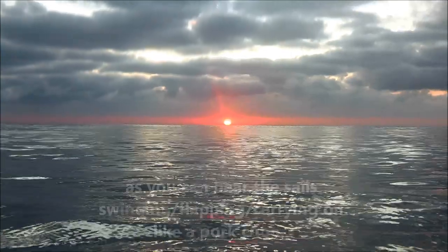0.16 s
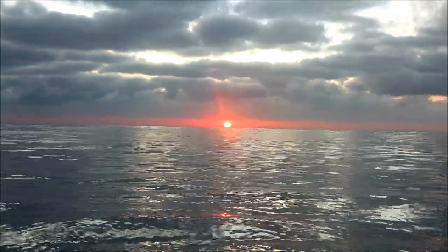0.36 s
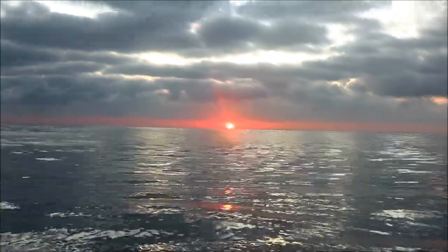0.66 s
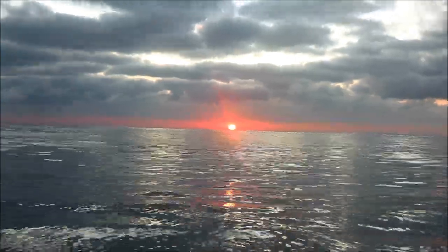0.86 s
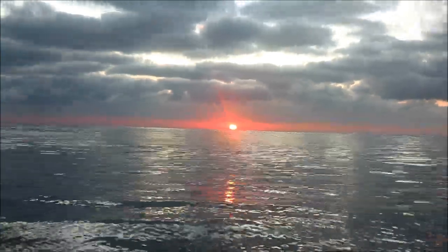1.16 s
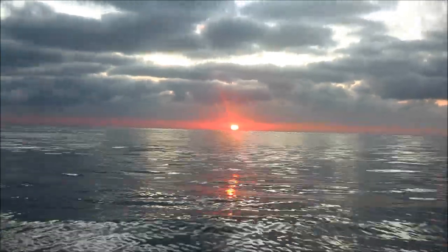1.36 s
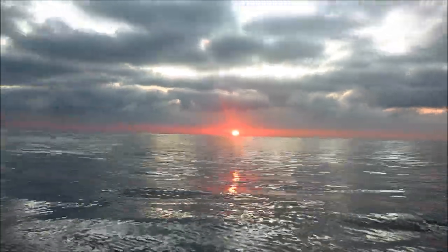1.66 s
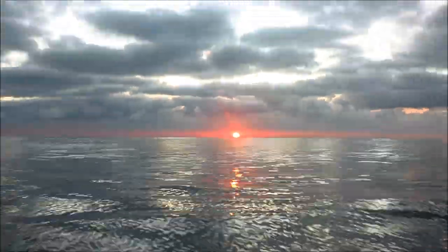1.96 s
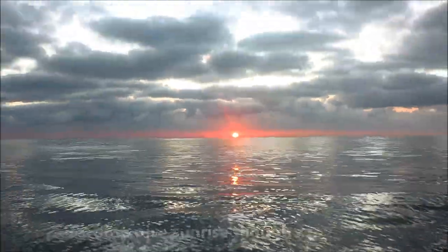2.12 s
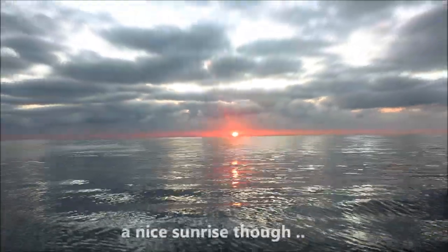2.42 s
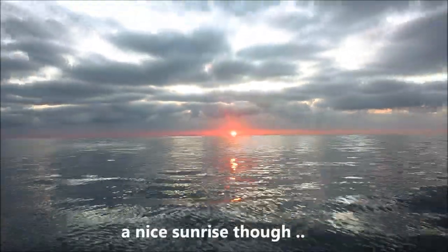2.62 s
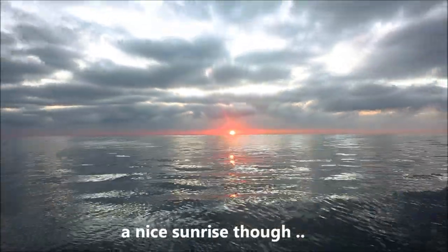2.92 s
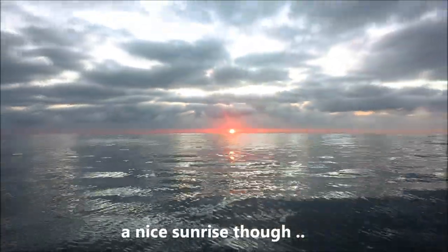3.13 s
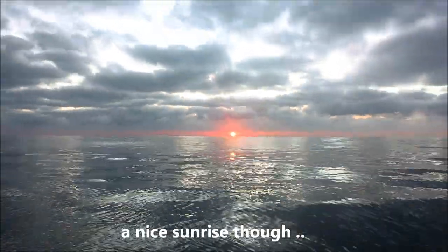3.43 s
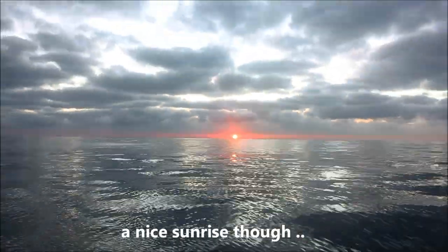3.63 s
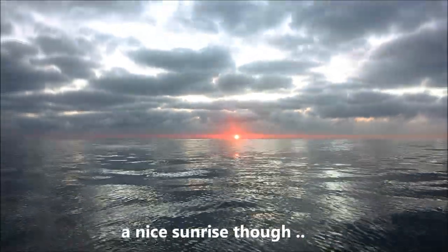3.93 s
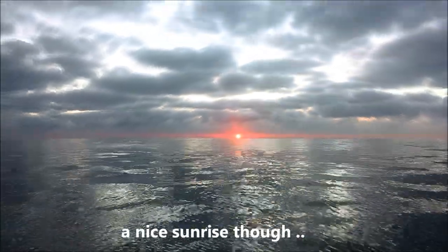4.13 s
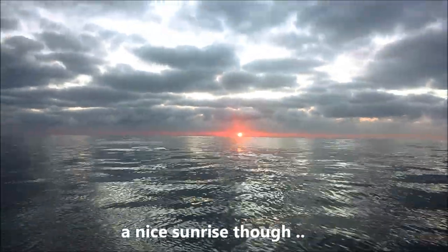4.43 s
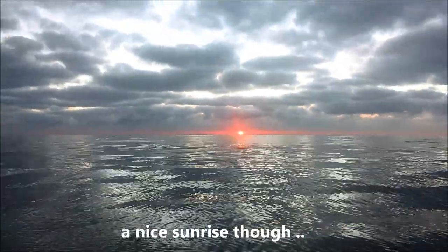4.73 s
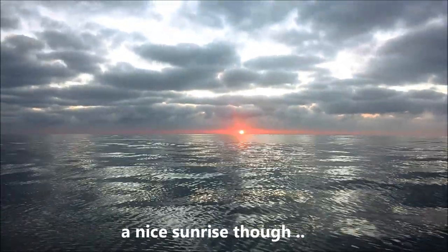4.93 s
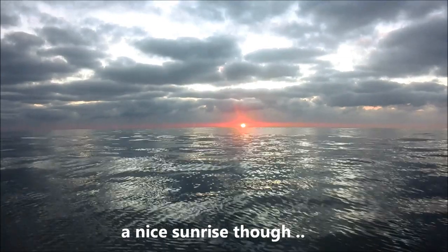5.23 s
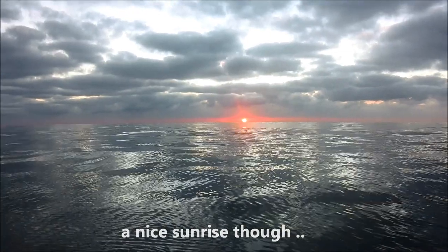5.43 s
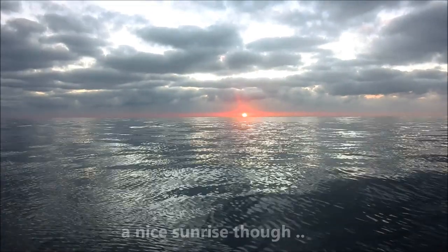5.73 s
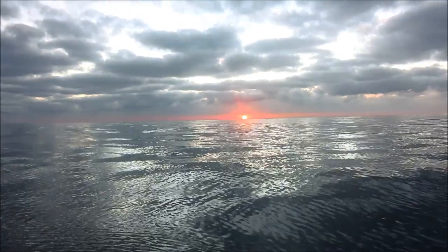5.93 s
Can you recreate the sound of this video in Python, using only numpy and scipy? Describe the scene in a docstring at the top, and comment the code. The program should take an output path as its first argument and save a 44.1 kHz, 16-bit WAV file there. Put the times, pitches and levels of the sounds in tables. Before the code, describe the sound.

On the deck of a becalmed sailing boat, a ratchet block purrs at once with rapid clicks and a low deck rumble, then stops. Loose fittings clack and jingle. Two more strong ratchet pulls follow, parted by a hard knock, then more clatter and a brief weak purr. Sails puff low air past close stereo microphones; water laps faintly.

```python
"""A ratchet block purrs at once: on a becalmed sailing boat, a sheet runs again and again, shaking the deck.
Each pull is a train of pawl clicks rung through housing and deck; knocks are short groups of decaying tones.
Slack lines and fittings snap taut and clack: noise bursts, chattering through the rig's resonances.
Flapping sails push short low waves of air, and eddies of noise, past two small microphones on deck.
Water washes faintly along the hull as filtered noise."""
import sys
import numpy as np
from scipy import signal
from scipy.fft import rfft, irfft, next_fast_len
from scipy.io import wavfile
from scipy.ndimage import map_coordinates

SR = 44100
rng = np.random.default_rng(int(sys.argv[2]) if len(sys.argv) > 2 else 0)


def materialize(psi):
    """Save the field psi as 16-bit PCM at rate SR to the path in sys.argv[1].

    A 1-D psi becomes a single channel; in a 2-D psi each row is a channel.
    """
    bounded = np.clip(np.atleast_2d(psi).T, -1, 1)
    quanta = np.round(bounded * 32767).astype(np.int16)
    wavfile.write(sys.argv[1], SR, quanta)


N = 267844
TIME = np.arange(N) / SR  # s

# single puffs of air off the sails: at_s, relative level_db, pitch_hz, left_over_right_db
PUFFS = [(0.137, -21, 143, -15), (0.187, -21.5, 120, -4), (.246, -22.5, 210, -9), (0.298, -32, 139, 8),
         (0.398, -20.5, 114.9, 7), (0.446, -19, 196, 2), (0.705, -21, 280, -10), (.732, -18, 165, -4),
         (.763, -20.5, 162.7, -4), (.781, -27, 332, -13), (0.798, -24.5, 262, 0), (0.853, -24.5, 192, 4.5),
         (0.891, -27, 294, 5), (1.0, -18.5, 134, 6), (1.077, -20.5, 191, 4.5), (1.426, -33.5, 101, 1),
         (2.803, -20.5, 257, -1), (2.884, -24, 157, -20), (2.98, -14, 112, -27), (3.071, -13.5, 172.6, -31),
         (3.133, -14, 153, -19), (3.217, -23.5, 172.6, -30), (3.277, -23, 96, -27), (3.355, -16, 104.6, 28),
         (3.48, -20, 134.9, -5), (3.616, -19, 144.9, -10), (3.849, -23.5, 110, -13), (4.175, -24.5, 152, 0),
         (4.223, -24.5, 212, -9), (4.272, -27, 251, 0), (4.346, -24, 134, -7), (5.815, -37, 100, 19)]
# resonances of the rig: pitch_hz, width_hz, level_db
RIG_MODES = [(456, 8.6, -30), (877, 25, -10.5), (1273, 20, -5.5), (1680, 12, 0.5), (2070, 15, -25),
             (2500, 50.04, -23), (3190, 86, -20), (4537, 150, -25)]


def amp(db):
    """Decibels to gain."""
    return 10 ** (np.asarray(db) / 20)


def unit(x):
    """Scaled to rms 1."""
    return x / np.sqrt(np.mean(x ** 2) + 1e-20)


def along(points, hz):
    """(Hz, value) points read on a log frequency axis."""
    f, v = np.transpose(points)
    return np.interp(np.log(hz + 1), np.log(f + 1), v)


def shape(points):
    """The gain function of a spectrum given as (Hz, dB) points."""
    return lambda hz: amp(along(points, hz))


def wobble(rate):
    """A smooth random curve, rate knots a second."""
    knots = rng.standard_normal(int(N * rate / SR) + 4)
    return map_coordinates(knots, [TIME * rate])


def filtered(x, response):
    """x times a complex response of frequency."""
    size = x.shape[-1]
    m = next_fast_len(size + size // 8)
    return irfft(rfft(x, m) * response(np.fft.rfftfreq(m, 1 / SR)), m)[..., :size]


def noise(colour, size=N):
    """Stereo noise of rms 1, more alike at the two microphones in the bass than in the treble."""
    # likeness of the two microphones: pitch_hz, left-right correlation (0 to 1)
    alike = [(60, 0.88), (150, 1), (600, 0.91), (1400, 0.85), (3100, 0.87), (6800, 0.65), (15000, 0.39)]

    def mid_and_side(hz):
        turn = np.arccos(np.clip(along(alike, hz), -1, 1)) / 2
        return colour(hz) * np.array([np.cos(turn), np.sin(turn)])

    mid, side = filtered(rng.standard_normal((2, size)), mid_and_side)
    return unit(np.array([mid + side, mid - side]))


def ring(x, modes, direct_db):
    """x through a body: a direct part plus its (Hz, width Hz, dB) resonances."""
    def response(f):
        resonances = sum(amp(db) * 1j * f * w / (c * c - f * f + 1j * f * w) for c, w, db in modes)
        return amp(direct_db) + resonances

    return filtered(x, response)


def add(track, s, sound):
    """Mixes a sound into the track at s seconds."""
    part = track[..., max(round(s * SR), 0):][..., :sound.shape[-1]]
    part += sound[..., :part.shape[-1]]


def dying(power, t60):
    """The amplitude of energy that drains away after each blow."""
    keep = amp(-120 / (t60 * SR))
    return np.sqrt(np.abs(signal.lfilter([1 - keep], [1, -keep], power)))


def swells(rows, rise_s, fall_s):
    """The summed power of (start, length, dB) spells that rise, hold and fall exponentially."""
    def outside(s, length):
        return np.maximum(s - TIME, 0) / rise_s + np.maximum(TIME - s - length, 0) / fall_s

    return sum((amp(db) * np.exp(-outside(s, length))) ** 2 for s, length, db in rows)


def sea():
    """Calm water laps along the hull: noise whose level wavers gently."""
    # colour of the water: pitch_hz, relative density_db per Hz
    water = [(20, -27), (50, 6), (100, 6), (330, 9.5), (550, 0.5), (1000, -4), (2000, -11.5), (7000, -16.5),
             (12000, -21.5), (14000, -33)]
    lapping_db = 1.2 * wobble(3) + 1.5 * wobble(14)
    return amp(-60.5 + lapping_db) * noise(shape(water))


def draught():
    """The strength of the eddies: each swing of the sails fans the deck, and each puff has its wake."""
    # sails swinging across: start_s, length_s, eddies level_db
    swings = [(.12, 0.96, -49), (1.305, 0.18, -50.5), (2.25, .55, -56), (2.92, .73, -45.5),
              (3.85, 0.53, -44.5), (4.55, .43, -54.5)]
    still_air_db, swing_rise_s, swing_fall_s = -73, 0.053, 0.12
    wake_db, wake_s = -18, 0.046  # level re the puff's table level; time to build and to die
    wakes = swells([(s, 0, db + wake_db) for s, db, *_ in PUFFS], wake_s, wake_s)
    return np.sqrt(amp(still_air_db) ** 2 + swells(swings, swing_rise_s, swing_fall_s) + wakes)


def sails():
    """Each flap pushes a short wave of air past the microphones, amid low turbulent eddies."""
    # colour of the turbulence: pitch_hz, relative density_db per Hz
    eddy_colour = [(15, -43), (35, -8), (60, 0.5), (95, 5), (160, -0.5), (280, -8), (450, -23), (1000, -58),
                   (3000, -90)]
    t = np.arange(-SR // 25, SR // 25) / SR
    puffs = np.zeros((2, N))
    for s, db, hz, pan_db in PUFFS:
        phase = rng.uniform(0, 2 * np.pi) + 0.5 * rng.standard_normal((2, 1))
        puff = np.exp(-(t * hz / 0.63) ** 2) * np.cos(2 * np.pi * hz * t + phase)
        balance = unit(amp([[pan_db / 2], [-pan_db / 2]]))
        add(puffs, s + t[0], amp(db - 7) * balance * puff)
    lumps = amp(2.9 * np.array([wobble(35), wobble(35)]))
    # part of the turbulence is each microphone's own
    own = unit(filtered(rng.standard_normal((2, N)), shape(eddy_colour)))
    eddies = unit(lumps * (noise(shape(eddy_colour)) + own) * amp([[-1], [1]]))
    return puffs + draught() * eddies


def stir():
    """How much the loose gear moves: a little at rest, more in spells as the boat rolls."""
    # spells of rustling: start_s, length_s, level_db
    spells = [(0, 0.83, -52.5), (1.5, 0.68, -53), (2.85, 1.108, -51.5), (4.2, 0.67, -57.5),
              (5.1, 0.54, -64.5)]
    rest_db, rise_s, fall_s = -70, 0.09, 0.11
    return np.sqrt(amp(rest_db) ** 2 + swells(spells, rise_s, fall_s))


def tick(tilt_db, t60):
    """One hard contact: it grinds for 1.5 ms, then dies."""
    # colour of a hard contact: pitch_hz, relative density_db per Hz
    contact = [(80, -33), (400, -10.5), (1000, -7), (3500, 8), (7000, 8), (12000, 5.5), (15000, -3)]
    t = np.arange(SR // 20) / SR

    def tilted(hz):
        return shape(contact)(hz) * amp(tilt_db * np.log2(np.maximum(hz, 900) / 3000))

    burst = noise(tilted, size=len(t))
    grinding = 1.6 * np.tanh(burst / 1.6)  # sliding friction bounds the force
    onset = 1 - np.exp(-t / 0.0005)
    return 0.8 * grinding * amp(-60 * np.maximum(t - 0.0015, 0) / t60) * onset


def fittings():
    """Sharp contacts of fittings over the fine rustle of loose gear, both ringing the rig."""
    # hard contacts: at_s, relative level_db, tilt_db per octave
    contacts = [(.683, -38, -15), (.865, -44.5, -10.5), (1.025, -54, 5), (1.146, -38.5, -3.5),
                (1.204, -30.5, -1), (1.242, -40, 2), (1.469, -42, -2), (1.475, -39.5, -3),
                (1.481, -32, -5.5), (1.486, -29.5, 5), (1.534, -43, -11), (2.005, -44, -6.5),
                (2.029, -48, -6), (2.053, -32, -5.5), (2.095, -36.5, 5), (2.133, -37.5, 7), (2.168, -34, 4),
                (2.211, -40, -11), (2.802, -29, -6), (2.938, -31, -10.5), (3.185, -39, -3.5),
                (3.829, -39, -6), (3.961, -36, -10), (4.033, -45.5, -5), (4.064, -29.5, -5.5),
                (4.356, -35.5, -5.5), (4.52, -29.5, -1), (4.575, -29, -12.5), (4.603, -32, 6),
                (4.656, -35, -1), (4.683, -30, 0), (4.702, -31.5, 4), (4.718, -36, 1), (4.739, -35, -10),
                (4.854, -37, 0), (5.384, -39.5, 4.5), (5.513, -39, 1), (5.534, -30, -1), (5.595, -46, 8),
                (5.84, -39.5, 1), (6.045, -49, -6)]
    ticks = np.zeros((2, N))
    for s, db, tilt_db in contacts:
        add(ticks, s, amp(db + 6.0) * tick(tilt_db, t60=0.015))
    # the rustle: many touches of random time and force
    when, size = rng.random((450, 2)).T
    touches = np.bincount((when * N).astype(int), amp(9.3 * size) ** 2, N)
    colour = [(150, 9.5), (500, 0.5), (1500, 1.5), (3500, -4.5), (7000, -12.0), (13000, -12.5)]
    rustle = noise(shape(colour)) * dying(touches, t60=0.081)
    return ring(ticks + stir() * unit(rustle), RIG_MODES, direct_db=-0.5)


def knocks():
    """Blocks and shackles strike the deck and boom; each rings in four modes around its pitch."""
    # strikes: at_s, level_db before the mode levels, pitch_hz, t60_s
    strikes = [(.418, -31, 534, 0.15), (0.718, -35, 337.4, 0.21), (.887, -36.5, 623, .07),
               (1.066, -51, 1460, 0.18), (1.322, -45, 2650, 0.032), (1.339, -39.5, 1440, .057),
               (1.645, -37, 1990, 0.23), (1.799, -31, 1043, 0.042), (2.051, -26, 3215, .058),
               (2.802, -13.5, 740.6, 0.012), (2.938, -19.5, 1362, 0.03), (2.94, -26.5, 391, 0.26),
               (2.977, -25, 1010, 0.022), (2.994, -21.5, 476, .15), (3.935, -36, 1150, .097),
               (3.96, -33, 490, .064), (4.254, -46, 940, 0.029), (4.571, -22, 911, 0.079),
               (4.78, -27.5, 2837, 0.051), (5.534, -31.5, 2317, 0.1), (5.534, -26.5, 3320, 0.095)]
    t = np.arange(SR // 4) / SR
    out = np.zeros(N)
    for s, db, hz, t60 in strikes:
        tones = np.zeros(len(t))
        for ratio, level_db in [(0.89, -8.5), (1, -5.5), (1.09, -9), (1.45, -13)]:
            tones += amp(level_db) * np.sin(2 * np.pi * hz * ratio * t + rng.uniform(0, 2 * np.pi))
        add(out, s, amp(db - 60 * t / t60) * tones * (1 - np.exp(-t / 0.00085)))
    return out


def clacks():
    """After a blow, slides and shackles chatter along the spar and die out: knock, clatter and jingle."""
    # blows that shake the rig: at_s, relative shudder_db, knock_db and jingle_db re shudder, base t60_s
    blows = [(.419, -45.5, 10, -16, 0.19), (0.861, -46.5, -3, -12, .1), (.885, -51.5, 8, -15, 0.28),
             (1.063, -51, -5.5, -4, 0.16), (1.145, -49, 5, -3, 0.19), (1.203, -39, -2, -1, .2),
             (1.318, -43, 0, -0.5, 0.084), (1.362, -50, -1, -1, 0.16), (1.481, -38, -0.5, -1, 0.083),
             (1.552, -35.5, -2.5, -0.5, .19), (1.582, -56.5, 13, -3, 0.35), (1.625, -39.5, -6, -12, 0.24),
             (1.642, -32, -13.5, 1, .17), (1.797, -48, 12, -3, .21), (2.054, -31.5, 0, -2, .15),
             (2.131, -43, 3.5, -3, 0.14), (2.169, -39, 2, -4, 0.18), (2.207, -44, 7, -2, 0.068),
             (2.886, -39, 7.5, 3.5, 0.14), (2.975, -31, 9, -1.5, .16), (2.996, -56, 11, -10, .1),
             (3.095, -41.5, 10.5, -19, 0.21), (3.183, -53.5, 16.5, 0, 0.24), (3.94, -48.5, 17.5, 3, 0.18),
             (3.96, -27, -11, 4.5, 0.11), (4.089, -49.5, 7, -11, 0.11), (4.23, -53, 7.5, 3, 0.13),
             (4.253, -37.5, 4.5, -14, 0.049), (4.357, -47.5, 7.5, -1, 0.15), (4.519, -35.5, 1, 0, .14),
             (4.569, -35, -4.5, 2.5, 0.18), (4.6, -50, 6.5, 7, .25), (4.63, -35, -7, -6, 0.27),
             (4.698, -36, -3, -2, 0.32), (4.733, -33.5, -8.5, 0.5, .19), (4.78, -38.5, -14, 0.5, .2),
             (4.853, -44, 0.5, 0, 0.18), (4.961, -36, -1.5, 1.5, 0.18), (5.532, -33, 0.5, 3.5, .15),
             (5.84, -45.5, 7.5, 2, .12)]
    # lives of knock, clatter and jingle, as shares of the blow's base t60
    life = [1.265, 0.9, .9]
    t = np.arange(SR // 3) / SR
    knock = noise(shape([(50, -15), (200, 3.5), (400, 4.0), (900, 1.0), (1400, -5.5), (3000, -70)]))
    clatter = noise(shape([(500, -22), (1100, -2.5), (2000, -0.5), (3500, -1.5), (5000, -41), (9000, -39)]))
    jingle = noise(shape([(2000, -8), (3900, 1.5), (5500, 0.0), (8000, -5), (12000, -5.0), (15000, -30)]))
    chatter = amp(2.33 * wobble(450) - 2.5) * np.array([knock, clatter, jingle])
    rise = 1 - np.exp(-t / 0.0023)
    out = np.zeros((2, N))
    for s, db, knock_db, jingle_db, t60 in blows:
        fade = rise * amp(-60 * t / (t60 * np.array(life)[:, None]))
        levels = amp([[db + knock_db], [db], [db + jingle_db]])
        contacts = chatter.take(round(s * SR) + np.arange(len(t)), axis=2, mode="wrap")
        shudder = np.sum(contacts * (levels * fade)[:, None], axis=0)
        # every blow excites nine short resonances of its own
        pitches_hz = np.geomspace(1000, 7000, 9) * np.exp(0.13 * rng.standard_normal(9))
        own_modes = [(hz, 40 + hz / 80, -1) for hz in pitches_hz]
        add(out, s, ring(shudder, own_modes, direct_db=-1.0))
    return ring(out, RIG_MODES, direct_db=-0.5)


def load(start, end, growth_db):
    """One run in dB re its end: the load builds steadily, then the clicks fade as the sheave coasts."""
    coast_db_per_s = 296
    building = growth_db * (np.minimum((TIME - start) / (end - start), 1) - 1)
    return building - coast_db_per_s * np.maximum(TIME - end, 0)


def run_levels():
    """The drive of the pawl clicks and of the deck rumble through all runs."""
    # the sheet running: start_s, end_s, relative click_db and rumble_db at the end, rumble growth_db
    runs = [(0, 0.677, -37, -43, 8), (2.2, 2.785, -36, -37, 8), (2.827, 3.048, -39, -35.5, 14),
            (3.264, 3.84, -36.5, -41.5, 3.5), (4.58, 4.79, -43, -48.5, 5), (5.382, 5.5, -49.5, -50.5, 0)]
    click_growth_db = 5.5
    click = sum((TIME >= s) * amp(db + load(s, end, click_growth_db)) for s, end, db, _, _ in runs)
    rumble = sum((TIME >= s) * amp(db + load(s, end, growth_db)) for s, end, _, db, growth_db in runs)
    return click, rumble


def pawl(rate, running, offset, jitter_s, scatter_db):
    """One blow per tooth, as impulses of about the same mean power at any speed."""
    teeth = np.flatnonzero(np.diff(np.floor(np.cumsum(rate * running) / SR + offset)))
    late, size = rng.standard_normal((len(teeth), 2)).T
    at = np.clip(teeth + (late * jitter_s * SR).astype(int), 0, N - 1)
    return np.bincount(at, amp(scatter_db * size) * np.sqrt(SR / rate[teeth]), N)


def struck(blows, spectrum, t60, same):
    """A body's answer to blows: a share rings the same each time, the rest is new with every blow."""
    t = np.arange(SR // 5) / SR
    answer = unit(noise(shape(spectrum), size=len(t)) * amp(-60 * t / t60)) / np.sqrt(len(t))
    repeated = signal.fftconvolve(blows[None], answer, axes=1)[:, :N]
    fresh = noise(shape(spectrum)) * dying(blows ** 2, t60)
    share = np.clip(same, 0, 1)
    return np.sqrt(share) * repeated + np.sqrt(1 - share) * fresh


def ratchets():
    """Two pawls click in turn, about half a tooth apart; their housing and the deck ring on."""
    # the sheave's speed, one curve a pull: at_s, clicks_per_s of each pawl
    speed = [
        [(0, 79), (.1, 90), (.25, 86), (.42, 92), (.55, 84), (.84, 37.8)],
        [(2.2, 52), (2.35, 55.5), (2.5, 56), (2.62, 60.6), (2.79, 67.6), (3.04, 72.3), (3.1, 52)],
        [(3.265, 73), (3.35, 81), (3.45, 86), (3.75, 88.5), (3.855, 72), (3.89, 52)],
        [(4.58, 40), (4.8, 49)],
        [(5.385, 53), (5.49, 56)],
    ]
    # colour of the pawl's snap: pitch_hz, relative density_db per Hz
    pawl_colour = [(300, -38.5), (1200, -0.5), (2000, -12.5), (3400, -20.5), (4600, -25), (6500, -2),
                   (12000, -7.5), (15000, 3)]
    # colour of the block's housing: pitch_hz, relative density_db per Hz
    housing_colour = [(300, -41), (1200, 2), (2000, -2.5), (3400, 0.5), (4600, 3), (6500, -5), (12000, -1),
                      (15000, -7.5)]
    # colour of the shaken deck: pitch_hz, relative density_db per Hz
    deck_colour = [(40, -30), (120, -2), (300, 1.5), (550, 2), (800, -2), (1200, -7.5), (1800, -13.5),
                   (4000, -28.5), (7000, -25.5), (12000, -39)]
    # resonances of the deck: pitch_hz, width_hz, level_db
    deck_modes = [(157, 10, 10), (341, 45, -3), (481.5, 22, 2), (640, 160, -11), (963, 85, 1.5),
                  (1030, 69, -3), (1488, 15, 12), (2300, 20, 17)]
    rate = np.interp(TIME, *np.transpose(np.concatenate(speed)))
    running = sum((TIME >= pull[0][0]) & (TIME <= pull[-1][0]) for pull in speed)
    click, rumble = run_levels()
    first = pawl(rate, running, offset=0.9, jitter_s=0.0003, scatter_db=1.5)
    second = pawl(rate, running, offset=0.4 + 0.13 * wobble(6), jitter_s=0.00054, scatter_db=1.5)
    # the second pawl bites harder with speed (15 dB an octave), as hard as the first at 77.5 clicks per s
    bite = amp(15 * np.log2(rate / 77.5))
    blows = (first + bite * second) / np.sqrt(1 + bite ** 2)
    clicks = blows * click
    snap = struck(clicks, pawl_colour, t60=0.011, same=0.15)
    housing = struck(clicks, housing_colour, t60=0.075, same=0.55)
    deck = ring(struck(blows * rumble, deck_colour, t60=0.12, same=0.51), deck_modes, direct_db=-2.5)
    return amp(-1.0) * snap + amp(-5) * housing + amp(-2) * deck


def scene():
    """Everything heard on deck; the rig lies a little to the right, so its sound reaches that side first."""
    rig = ratchets() + clacks() + knocks() + fittings()
    lag_s = 0.00006  # left behind right
    placed = filtered(rig, lambda hz: np.exp(np.array([[-1j], [1j]]) * np.pi * hz * lag_s))
    return placed + sails() + sea()


def record(dry):
    """The right microphone's port resonates in the treble; nothing is kept above the band limit."""
    # response of the left microphone: pitch_hz, gain_db
    left_mic = [(100, -0.5), (11000, -1.5), (12300, -4.5), (13500, -13.5), (15000, -48)]
    # response of the right microphone: pitch_hz, gain_db
    right_mic = [(100, -1), (300, -0.5), (700, 2.5), (2400, 2), (4400, 4.5), (6000, 7), (7200, 16),
                 (8200, 10.5), (10000, -5), (12000, -14.5), (13800, -21), (15000, -40)]
    top_hz = 15700
    return filtered(dry, lambda hz: np.array([shape(left_mic)(hz), shape(right_mic)(hz)]) * (hz < top_hz))


dry = scene()
out = record(dry)
materialize(out)
```